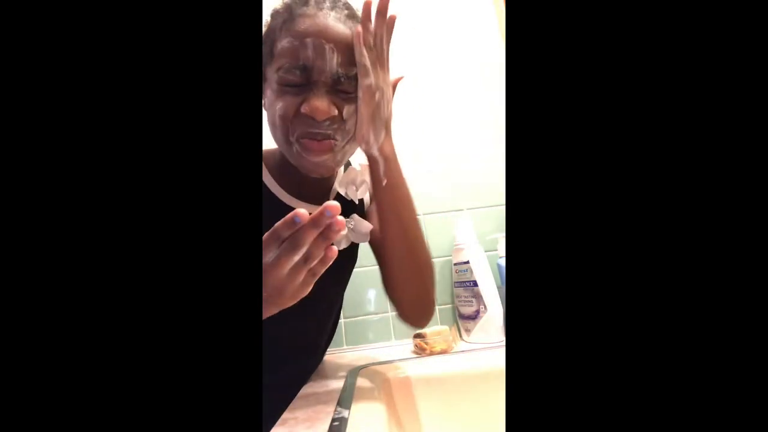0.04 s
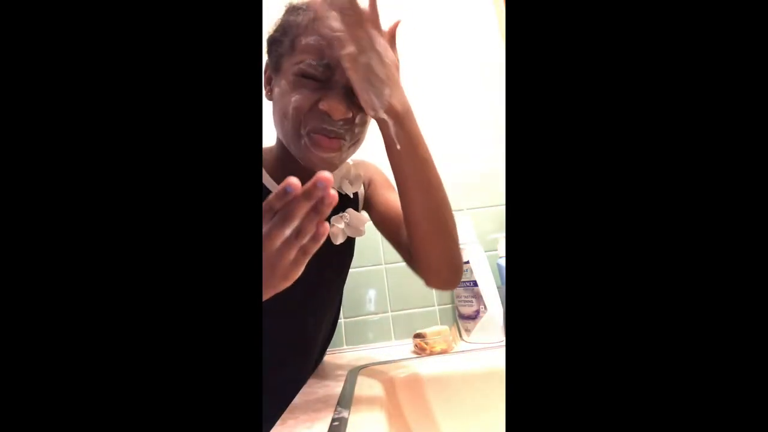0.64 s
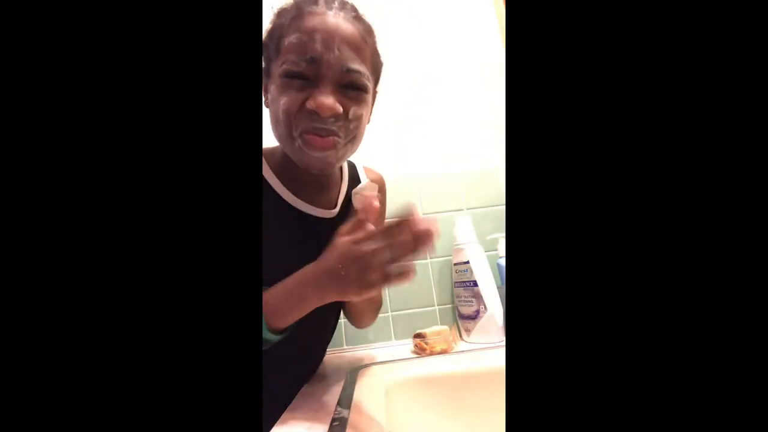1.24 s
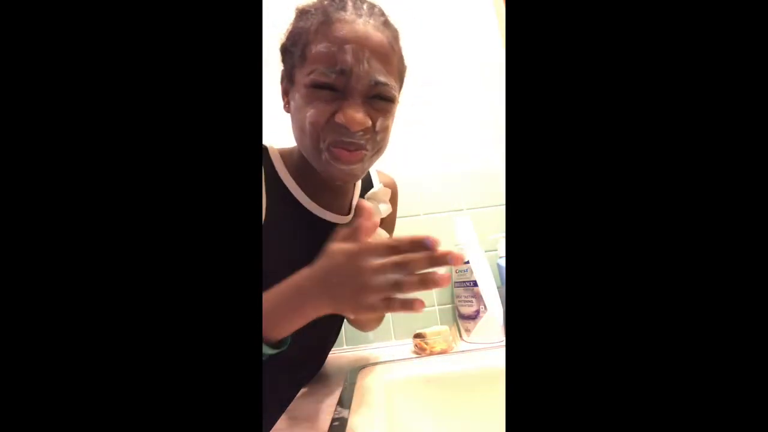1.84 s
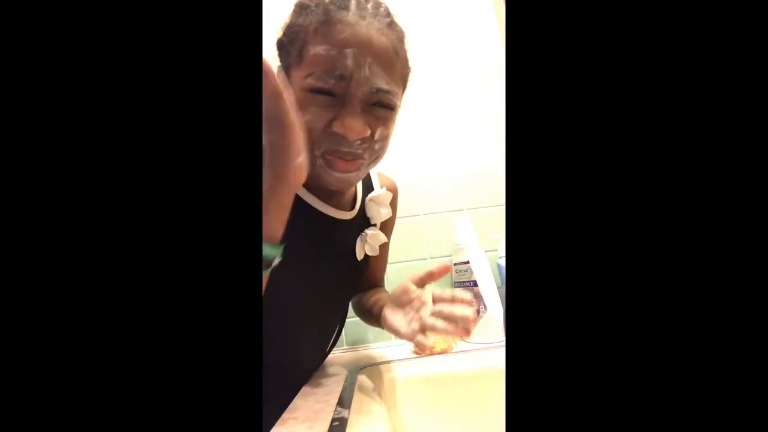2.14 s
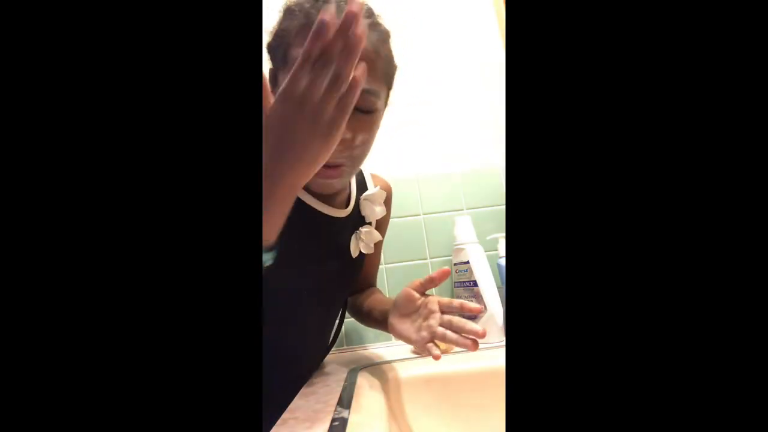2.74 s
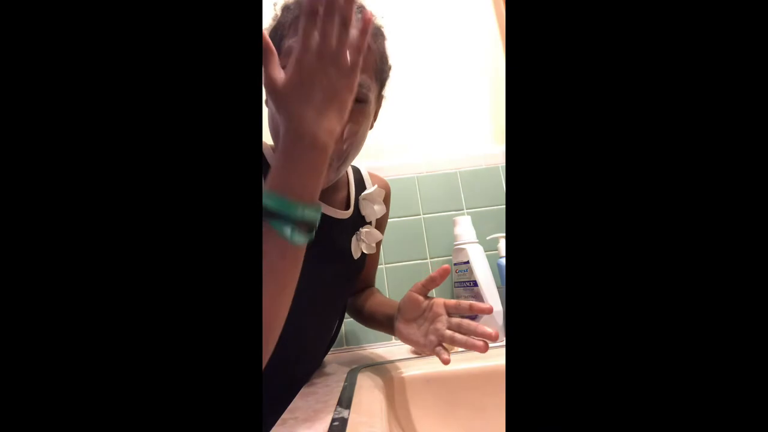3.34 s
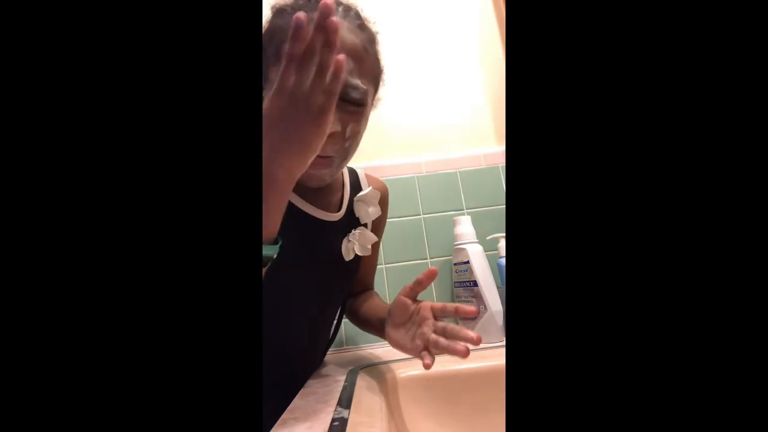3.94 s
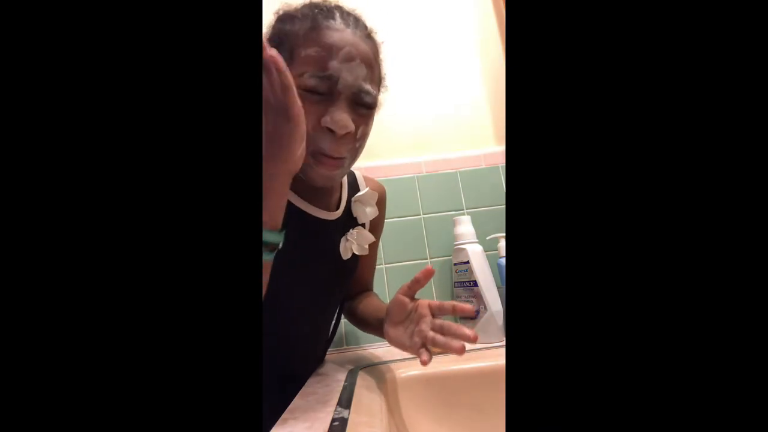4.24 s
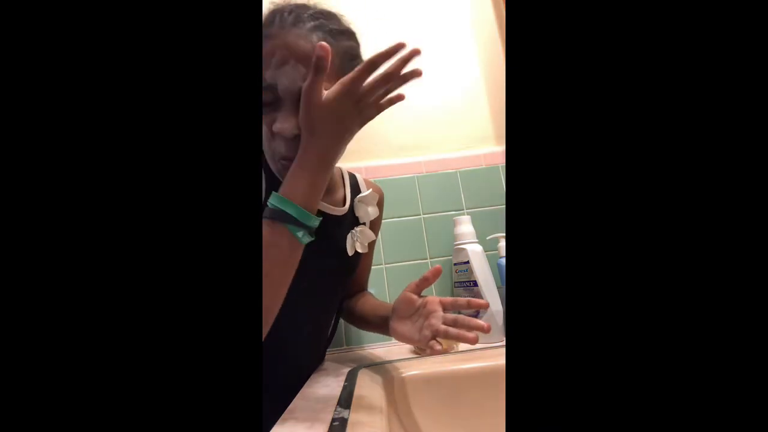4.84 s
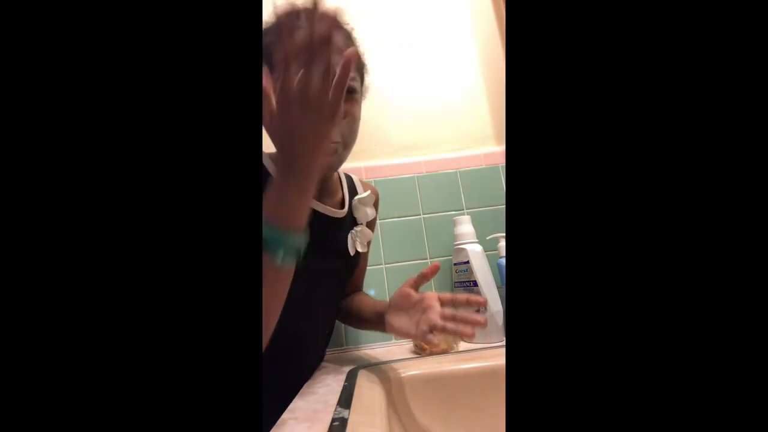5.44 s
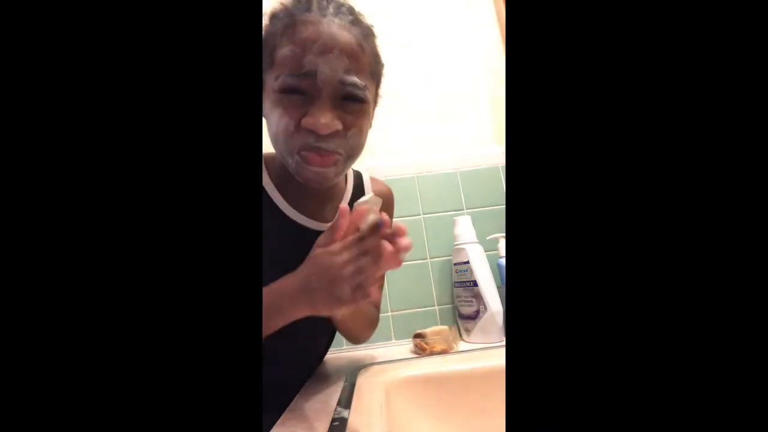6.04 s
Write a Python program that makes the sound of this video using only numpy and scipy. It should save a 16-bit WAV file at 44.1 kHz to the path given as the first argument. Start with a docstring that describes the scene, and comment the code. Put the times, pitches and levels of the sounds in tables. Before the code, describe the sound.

Soapy hands rub lather over a face in a small bathroom, with faint foam crackles, soft thumps and one wet clap.

```python
"""Small tiled bathroom, at the sink: soapy hands work lather over a face.
Foam crackles under each stroke, bubbles pop, air squelches between the rubbing palms.
An arm swings up with a dull brush, hands thump softly on the head, and near the end the wet
hands meet in one clap. Underneath: steady air noise, one swell of rumble, a low fading hum."""
import sys
import numpy as np
from scipy import signal
from scipy.fft import rfft, irfft
from scipy.io import wavfile
from scipy.ndimage import uniform_filter1d

SR = 44100
rng = np.random.default_rng(int(sys.argv[2]) if len(sys.argv) > 2 else 0)


def generate_wav(sig):
    """Save sig (samples, or channels by samples) to the path in sys.argv[1] as 16-bit PCM at SR."""
    pcm = np.round(np.clip(np.atleast_2d(sig).T, -1, 1) * 32767).astype(np.int16)
    wavfile.write(sys.argv[1], SR, pcm)


N = 272538
TIME = np.arange(N) / SR


def amp(db):
    """dB to gain."""
    return 10 ** (np.asarray(db) / 20)


def unit(x):
    """Scale to rms 1."""
    return x / np.sqrt(np.mean(x ** 2) + 1e-20)


def lookup(points, hz):
    """Interpolate a table over log frequency."""
    points_hz, value = np.transpose(points)
    return np.interp(np.log(hz + 1), np.log(points_hz + 1), value)


def colour(x, points):
    """Minimum-phase filter from (frequency [Hz], gain [dB]); white noise keeps its power."""
    gain = unit(amp(lookup(points, abs(np.fft.fftfreq(4096, 1 / SR)))))
    taps = np.fft.ifft(np.exp(np.conj(signal.hilbert(np.log(gain))))).real
    return signal.oaconvolve(x, taps)[:len(x)]


def add(mix, time_s, sound):
    """Mix a sound in at time_s."""
    part = mix[max(0, round(time_s * SR)):][:len(sound)]
    part += sound[:len(part)]


def ring(hz, t60_s, rise_s, glide=0):
    """Decaying sine, soft onset; glide lifts the pitch, as in an opening bubble."""
    t = np.arange(int(t60_s * SR) + 32) / SR
    turns = np.cumsum(np.minimum(hz * (1 + glide * t / t[-1]), SR / 2)) / SR
    envelope = np.exp(-np.log(1000) * t / t60_s) * (1 - np.exp(-(t / rise_s) ** 2))
    return envelope / envelope.max() * np.sin(2 * np.pi * turns)


def background(air_db=-62.4, rumble_db=-50, peak_s=.7, width_s=.32):
    """Steady air noise in the room's modes, plus one swell of narrow-band rumble."""
    # air spectrum: (frequency [Hz], gain [dB])
    air_colour = [(20, -32), (38, -17), (47, -7), (62, -2), (80, -6), (110, -2), (132, 0), (175, -13),
                  (205, -9), (260, -12.5), (330, -14), (400, -12), (540, -13), (680, -24), (900, -21.5),
                  (1200, -23.5), (2000, -31), (7500, -33), (8800, -38), (15000, -40.5), (16000, -45)]
    # rumble bands: (centre [Hz], width [Hz], level [dB])
    rumble_bands = [(51, 11, 0), (78, 30, -14), (120, 38, -3), (215, 30, -14)]
    air, noise = rng.standard_normal((2, N))
    hz, spectrum = np.fft.rfftfreq(N, 1 / SR), rfft(noise)
    rumble = np.zeros(N)
    for centre_hz, width_hz, db in rumble_bands:
        detune = 2 * (hz - centre_hz) / width_hz
        rumble += amp(db) * unit(irfft(spectrum / (1 + detune ** 2) ** 2, N))
    swell = amp(rumble_db) / (1 + ((TIME - peak_s) / width_s) ** 2) ** .66
    return amp(air_db) * unit(colour(air, air_colour)) + swell * unit(rumble)


def hum(waver_hz=3.5, waver_s=.08):
    """Low tones that waver and slowly fade."""
    # hum tones: (frequency [Hz], level [dB])
    tones = [(114, -66), (205, -63.5), (410, -75), (510, -74)]
    # hum envelope: (time [s], gain [dB])
    fade = [(0, -3), (.8, 0), (1.8, -1), (3.6, -5), (6, -12)]
    out, knots_s = np.zeros(N), np.arange(0, N / SR + waver_s, waver_s)
    for hz, db in tones:
        drift_hz = waver_hz * np.interp(TIME, knots_s, rng.standard_normal(len(knots_s)))
        out += amp(db) * unit(np.sin(2 * np.pi * np.cumsum(hz + drift_hz) / SR))
    return out * amp(np.interp(TIME, *np.transpose(fade)))


def crackle(lo_hz, hi_hz, per_s, spread_db, cycles, pitches=28, patch_db=4.0, patch_s=.014):
    """Tiny bubbles burst at random, a few much louder; each size gathers in brief patches."""
    out, knots_s = np.zeros(N), np.arange(0, N / SR + patch_s, patch_s)
    for hz in np.geomspace(lo_hz, hi_hz, pitches):
        onsets = np.flatnonzero(rng.random(N) < per_s / pitches / SR)
        patches = np.interp(onsets / SR, knots_s, np.clip(rng.standard_normal(len(knots_s)), -2, 2))
        strength = np.minimum(rng.exponential(1, len(onsets)), 3.5)
        bursts = np.zeros(N)
        bursts[onsets] = amp(patch_db * patches + spread_db * strength)
        bursts[onsets] *= rng.choice([-1, 1], len(onsets))
        bubble = ring(hz, cycles / hz, .5 / hz, glide=.035) * (hz / hi_hz) ** .77
        out += signal.oaconvolve(bursts, bubble)[:N]
    return unit(out)


def lather(rest_db=-83, release_s=.017, clump_db=2.0):
    """Strokes tear the foam, in clumps as skin sticks and slips; resting foam keeps fizzing."""
    # hand strokes: (start [s], length [s], attack [share of length], coarse foam [dB], fine foam [dB])
    strokes = [(0, 0.078, 0.021, -72.5, -76), (0.19, 0.12, 0.25, -77.5, -75), (0.322, 0.12, 0.13, -79, -78),
               (.52, 0.092, .4, -77, -86), (0.623, 0.15, 0.43, -75.5, -68.5),
               (1.166, 0.072, 0.19, -75.5, -66.5), (1.345, 0.028, 0.55, -66.5, -60),
               (1.383, 0.04, 0.6, -65.5, -64), (1.483, 0.063, 0.23, -76, -66.5),
               (1.561, 0.018, .4, -78, -68), (1.642, 0.11, 0.24, -68, -66.5), (2.46, 0.04, 0.43, -83, -69),
               (2.517, 0.0098, 0.24, -77, -60), (2.886, 0.099, 0.33, -75.5, -71.5),
               (3.072, .07, 0.23, -75.5, -70.5), (3.286, 0.083, 0.18, -77, -68.5),
               (3.399, 0.024, 0.36, -66.5, -66), (3.458, 0.082, 0.35, -75.5, -68.5),
               (3.651, 0.12, 0.19, -78.5, -73.5), (3.768, 0.05, 0.47, -75, -67),
               (3.908, 0.064, 0.26, -78, -73), (4.476, 0.074, .3, -81, -78),
               (4.634, 0.026, 0.27, -73.5, -73), (5.004, 0.13, 0.17, -77, -82),
               (5.154, 0.11, 0.15, -78.5, -74), (5.48, 0.14, 0.7, -69, -90),
               (5.728, 0.059, 0.56, -69.5, -66), (5.796, 0.085, 0.17, -70.5, -74.5),
               (5.883, 0.021, .4, -71.5, -65), (5.916, 0.081, 0.49, -69.5, -65),
               (6.1, 0.039, 0.5, -75, -60.5)]
    coarse_gain, fine_gain = np.full((2, N), amp(rest_db))
    for start_s, length_s, attack_share, coarse_db, fine_db in strokes:
        t = np.maximum(TIME - start_s, 0)
        attack = np.minimum(t / (attack_share * length_s), 1)
        pressure = attack * np.exp(-np.maximum(t - length_s, 0) / release_s)
        coarse_gain = np.maximum(coarse_gain, amp(coarse_db) * pressure)
        fine_gain = np.maximum(fine_gain, amp(fine_db) * pressure)
    coarse = coarse_gain * crackle(950, 6580, per_s=1500, spread_db=3.0, cycles=10.2)
    fine = fine_gain * crackle(9300, 13400, per_s=1800, spread_db=1.0, cycles=6.0)
    clumps = unit(amp(clump_db * unit(uniform_filter1d(rng.standard_normal(N), 250))))
    return clumps * (coarse + colour(fine, [(7000, 1.5), (10000, -7), (16000, -5.0)]))


def rub(scuff_db=-50, fast_db=-39, grip_db=2.5):
    """Skin and cloth slide: a soft, uneven brush, with a brighter scuff at speed."""
    # arm and palm sweeps: (fastest moment [s], level [dB], rise [s], fall [s])
    sweeps = [(.05, -62, 0.8, 0.3), (1.2, -60.5, 1, 1), (2.15, -44.5, 0.13, 0.077),
              (2.155, -37.5, 0.042, 0.066), (3.019, -52.5, 0.25, 0.29), (4.38, -65, 0.58, 0.17),
              (5.09, -62, 0.076, 0.14)]
    # brush spectrum: (frequency [Hz], gain [dB])
    brush_colour = [(20, -27), (90, -10), (130, 4.5), (175, -5), (210, 5.5), (270, 0.5), (320, 3), (400, 1),
                    (540, 1.5), (680, -11), (950, -12), (1400, -19.5), (2900, -30), (3800, -44),
                    (9000, -93)]
    # scuff spectrum: (frequency [Hz], gain [dB])
    scuff_colour = [(250, -20), (500, 11.5), (700, -1.5), (1000, -8), (1500, -22), (2100, -14), (2800, -7),
                    (3250, -13), (3700, -36), (4500, -55), (8000, -101)]
    grip = amp(grip_db * unit(uniform_filter1d(rng.standard_normal(N), 700)))
    brush, scuff = grip * rng.standard_normal((2, N))
    speed = np.zeros(N)
    for peak_s, db, rise_s, fall_s in sweeps:
        t = TIME - peak_s
        speed = np.maximum(speed, amp(db) * np.exp(np.minimum(t / rise_s, -t / fall_s)))
    scuff_gain = amp(scuff_db) * np.minimum(speed / amp(fast_db), 1) ** 1.21
    return speed * unit(colour(brush, brush_colour)) + scuff_gain * unit(colour(scuff, scuff_colour))


def pops(spray_trim_db=-6.5):
    """A bubble rings briefly while its film scatters into spray."""
    # bursts, dry ticks to wet smacks:
    # (time [s], peak [dB], pitch [Hz], t60 [s], spray offset [dB], spray decay [s])
    bubbles = [(0.589, -44.5, 9300, 0.0003, -12, 0.0022), (0.679, -49, 10000, 0.00052, -16, .002),
               (.792, -47, 11000, .0004, -10, .002), (0.863, -43.5, 11500, 0.00076, -10, 0.011),
               (0.9675, -52, 5570, 0.004, 3, 0.011), (1.0762, -48.5, 12000, .002, -2, 0.017),
               (1.24, -51, 11500, .0005, -16, .002), (1.313, -57, 6500, .003, 0, .004),
               (1.363, -51, 6560, .006, 0, .008), (1.435, -47.5, 2260, 0.014, 3, 0.0048),
               (1.508, -48.5, 3900, 0.008, 2.5, .01), (1.519, -47, 6050, 0.011, -12, .003),
               (1.555, -45, 11000, .0005, -9, .002), (1.6028, -50, 5500, .002, -1, .003),
               (1.6336, -35, 4450, 0.0015, -20, .002), (1.6338, -27, 6400, 0.00099, -19, 0.0072),
               (1.678, -46.5, 5430, .012, -3, .008), (1.7153, -40, 8500, 0.00027, -9, .001),
               (1.726, -39.5, 3600, 0.011, -6.5, 0.0063), (1.7278, -48.5, 4250, .014, -4, .008),
               (2.099, -46, 10600, 0.001, 0, 0.014), (2.395, -53, 11500, .0006, -14, .003),
               (2.472, -51.5, 3900, 0.0072, 7, 0.0041), (2.505, -42, 11500, 0.00047, -9, .002),
               (2.5206, -50, 3850, 0.013, 4.5, 0.0033), (2.532, -42, 11500, 0.00091, -11, 0.0059),
               (2.546, -38, 12600, .001, -25, .004), (2.5525, -42, 6250, 0.0046, -9, 0.0029),
               (2.6675, -47.5, 12000, .001, -21, .002), (2.7014, -52, 7600, 0.00044, 0, 0.0028),
               (2.708, -52.5, 6000, .005, 3, 0.0036), (2.7363, -44, 3960, 0.0033, -21, 0.0066),
               (2.738, -45, 1950, 0.0075, -17, .004), (2.8006, -37, 1820, 0.0061, -12.5, 0.022),
               (2.8015, -33.5, 2380, 0.014, -13.5, 0.018), (2.815, -43, 5200, .003, -6, 0.015),
               (2.893, -52, 3660, 0.0073, -1, .01), (2.946, -46.5, 5670, 0.0064, -3, 0.014),
               (3.06, -52, 3070, 0.012, -3.5, 0.011), (3.119, -51, 3570, 0.0074, 0.5, 0.011),
               (3.302, -58, 4300, .004, 3, 0.0054), (3.349, -50.5, 3400, 0.0058, -0.5, 0.008),
               (3.412, -54, 4600, .003, 0, .004), (3.493, -51, 7740, 0.0061, -6, .005),
               (3.741, -53, 4530, 0.00084, 5.5, 0.005), (3.946, -54, 9300, 0.0007, -5, .008),
               (4.7263, -61, 4100, 0.0069, 4.5, 0.013), (5.4148, -48, 5400, 0.00034, -1.5, 0.0039),
               (6.0037, -47.5, 3250, 0.0092, 2, 0.0075), (6.117, -39.5, 8100, 0.0013, -12, 0.0025),
               (6.129, -42, 8900, .002, -8, .005)]
    spray_colour = [(600, -49), (2500, 5.5), (4500, 11.0), (7500, 9.5), (10000, 2.0), (16000, 0.0)]
    rings, spray = np.zeros((2, N))
    t = TIME[:2400]
    for time_s, db, hz, t60_s, spray_db, decay_s in bubbles:
        add(rings, time_s, amp(db) * ring(hz, t60_s, 4.2 / hz, glide=.12))
        hiss = np.exp(-t / decay_s) * rng.standard_normal(len(t))
        add(spray, time_s, amp(db + spray_db + spray_trim_db) * hiss)
    return rings + colour(spray, spray_colour)


def thumps():
    """A hand meets the head softly and sets the room's lowest strong mode booming."""
    # soft blows: (time [s], peak [dB])
    blows = [(0.689, -47), (2.179, -35.5), (2.722, -41), (3.213, -50), (5.067, -53)]
    out = np.zeros(N)
    for time_s, db in blows:
        add(out, time_s, amp(db) * ring(hz=133, t60_s=.27, rise_s=.008))
    return out


def pats(squirt_decay_s=.0022, smack_db=-3, smack_decay_s=.017):
    """The wet film cracks and squirts out; flesh smacks shut and the trapped air pocket rings."""
    # wet palms landing:
    # (time [s], spray [dB], contact re spray [dB], squeeze [s], pocket pitch [Hz], pocket [dB])
    landings = [(1.0992, -45, 7, 0.005, 1960, -42), (2.133, -64, 0, 0.0012, 490, -40.5),
                (2.146, -66, -6, .002, 390, -38), (2.732, -60, -6, 0.0062, 1220, -54),
                (3.407, -55, -6, 0.0023, 520, -52), (3.733, -65.5, 13, 0.00133, 690, -55.5),
                (5.5847, -29.3, 12.5, 0.0057, 589, -28.5), (6.002, -54.5, -4, 0.003, 1300, -52)]
    # air pocket modes: (frequency [x pocket pitch], level [dB], t60 [s])
    pocket_modes = [(0.42, -16.5, 0.043), (1, 5, 0.012), (1.55, -1.5, 0.00048), (1.92, -4, 0.0015),
                    (3.0, -12, 0.041)]
    # spray spectrum: (frequency [Hz], gain [dB])
    spray_colour = [(40, -28), (150, -13), (700, -4), (1700, -0.5), (2600, -3), (3400, -1), (4500, -2),
                    (5500, 1), (7800, -1.5), (9000, -8.5), (13000, -12.5), (16000, -19)]
    # flesh smack spectrum: (frequency [Hz], gain [dB])
    smack_colour = [(40, -30), (120, -11), (190, -7), (250, 2), (330, -6), (450, 5), (620, 1), (900, 5),
                    (1150, 6.5), (1400, 0), (1750, 3), (2100, -9), (4000, -38)]
    pockets, spray, smack = np.zeros((3, N))
    t, click = TIME[:4000], np.array([1, 1, -1, -1])
    for time_s, spray_db, contact_db, squeeze_s, pocket_hz, pocket_db in landings:
        squirt, flesh = rng.standard_normal((2, len(t)))
        outflow = np.exp(-np.maximum(t - squeeze_s, 0) / squirt_decay_s)
        add(spray, time_s, amp(spray_db) * outflow * squirt)
        add(spray, time_s + .0004, amp(spray_db + contact_db) * click)
        shut_s = time_s + squeeze_s
        add(smack, shut_s, amp(spray_db + smack_db) * np.exp(-t / smack_decay_s) * flesh)
        for ratio, db, t60_s in pocket_modes:
            hz = pocket_hz * ratio
            add(pockets, shut_s, amp(pocket_db + db) * ring(hz, t60_s, 1.56 / hz))
    return pockets, colour(spray, spray_colour) + colour(smack, smack_colour)


def squelches(width_hz=380, spikes_per_s=500):
    """Air sings in a soapy gap, clean or stuttering; pitch glides as the gap changes size."""
    # air squeezes: (time [s], length [s], start pitch [Hz], end pitch [Hz], level [dB], roughness [0-1])
    squeezes = [(1.207, 0.05, 1670, 1510, -68, .8), (1.377, .04, 1120, 1265, -66, 0.9),
                (1.405, 0.036, 1660, 1560, -68, 0.6), (1.433, 0.024, 2200, 2620, -61.5, 0.5),
                (1.533, 0.022, 1120, 1355, -57.5, 0.27), (1.559, .024, 1540, 1640, -68, 0.1),
                (1.682, 0.032, 1500, 1875, -63, .3), (1.705, 0.017, 1600, 1520, -62, 0.4),
                (2.733, 0.023, 1270, 1195, -54, 0.3), (2.737, 0.02, 2020, 1830, -56, 0.54),
                (2.79, 0.022, 2050, 2330, -54, .8), (3.284, 0.033, 2450, 2590, -69, 0.7),
                (3.33, 0.035, 3670, 3110, -64.5, 1), (3.403, 0.044, 1114, 1185, -65.5, 0.9),
                (3.658, 0.044, 2516, 2500, -66, 0.8), (5.576, 0.009, 1250, 1400, -52, 0.5),
                (5.942, 0.042, 1700, 1520, -62, 0.4), (5.972, 0.024, 1370, 1270, -53.5, 0.35)]
    out, pole = np.zeros(N), np.exp(-np.pi * width_hz / SR)
    for time_s, length_s, start_hz, end_hz, db, rough in squeezes:
        size = int(length_s * SR)
        stutter = rng.standard_normal((2, 8000)) * (.097 + (rng.random(8000) < spikes_per_s / SR))
        flutter = unit(signal.lfilter([1], [1, -2 * pole, pole * pole], stutter)[:, -size:])
        carrier = np.exp(2j * np.pi * np.cumsum(np.linspace(start_hz, end_hz, size)) / SR)
        drive = 1 - rough + rough * (flutter[0] + 1j * flutter[1])
        add(out, time_s, amp(db) * unit((carrier * drive).real) * signal.windows.tukey(size, .6))
    return out


def bathroom(x, wet_db):
    """Direct sound, dense tile reflections (treble dies first) and standing waves."""
    # room decay: (frequency [Hz], t60 [s])
    room_t60 = [(130, .36), (500, .35), (1300, .31), (5000, .25), (14000, .17)]
    # scattered reflections: (frequency [Hz], gain [dB])
    diffuse_colour = [(60, -6), (150, -4), (300, -5), (1100, -4), (1600, -1), (3000, 0), (16000, 0)]
    # standing waves between the walls: (frequency [Hz], level [dB])
    room_modes = [(258, 8), (318, 13), (405, 8), (443, 10), (476, 11), (510, 6), (565, 12), (642, 9),
                  (710, 8), (786, 8), (834, 7), (899, 11), (948, 11), (1060, 11), (1138, 13), (1190, 9)]
    size = SR // 2
    t = TIME[:size]
    reflections = rng.choice([-1., 1.], size) * (rng.random(size) < .15) * (t > .003)
    hz, frame_s, spectra = signal.stft(reflections, SR, nperseg=256)
    decay = np.exp(-np.log(1000) * frame_s / lookup(room_t60, hz)[:, None])
    spectra = spectra * decay * amp(lookup(diffuse_colour, hz))[:, None]
    tail = signal.istft(spectra, SR, nperseg=256)[1][:size]
    tail /= np.linalg.norm(tail)
    for mode_hz, db in room_modes:
        damping = np.log(1000) / lookup(room_t60, mode_hz)
        tail += amp(db) * 2 * damping / SR * np.exp(-damping * t) * np.sin(2 * np.pi * mode_hz * t)
    return x + amp(wet_db) * signal.fftconvolve(x, tail)[:N]


def scene(echo_s=.0107, echo_db=-10):
    """Foam and hands in the room, over air noise and hum; mono."""
    foam = amp(3.5) * bathroom(lather(), wet_db=1.0) + bathroom(squelches(), wet_db=-6.5)
    pockets, slaps = pats()
    add(pockets, echo_s, amp(echo_db) * pockets)  # off the nearest wall
    skin = bathroom(rub(), wet_db=-9.5) + thumps()
    skin += bathroom(slaps, wet_db=-7.5) + bathroom(pockets, wet_db=-7.5)
    foam += bathroom(pops(), wet_db=-10.5)
    return (foam + skin + background() + hum())[None]


def record(dry, cutoff_hz=15950):
    """Steep low-pass band limit."""
    taps = signal.firwin(511, cutoff_hz, window=("kaiser", 9), fs=SR)
    return signal.oaconvolve(dry, taps[None], "same")


dry = scene()
out = record(dry)
generate_wav(out)
```